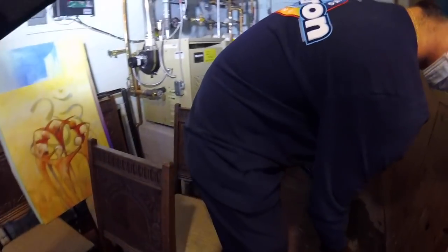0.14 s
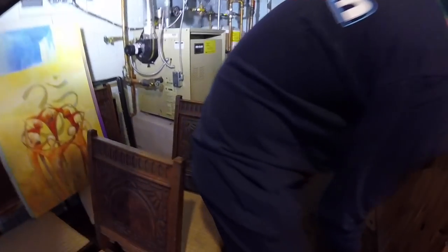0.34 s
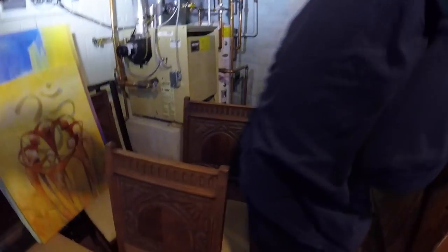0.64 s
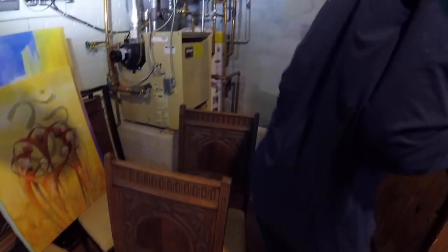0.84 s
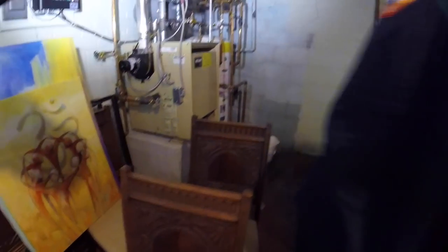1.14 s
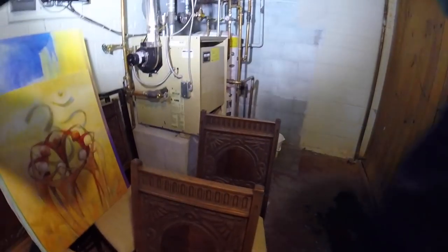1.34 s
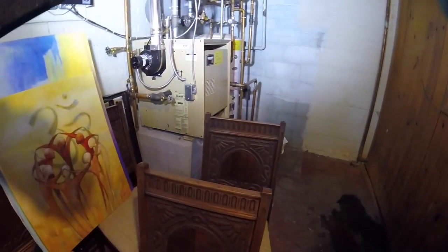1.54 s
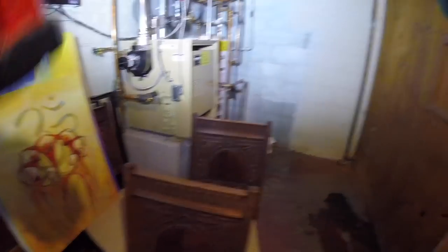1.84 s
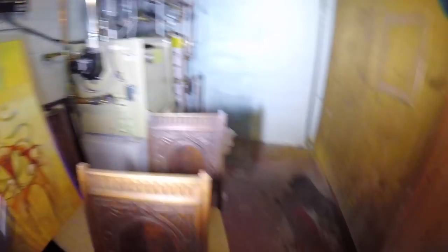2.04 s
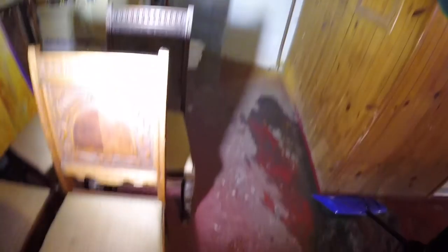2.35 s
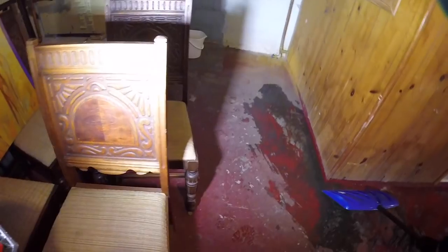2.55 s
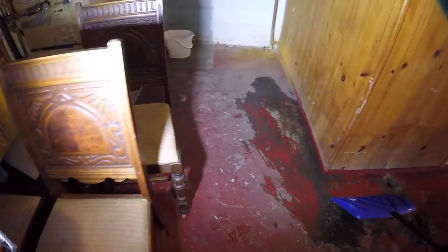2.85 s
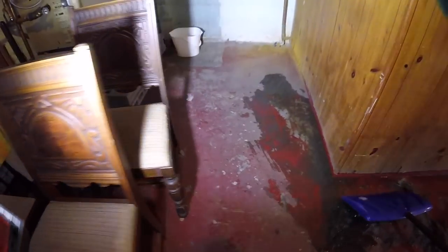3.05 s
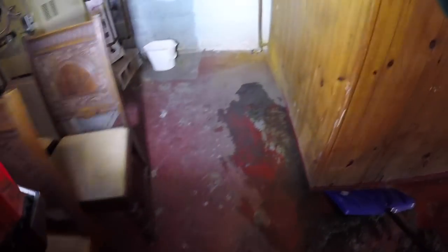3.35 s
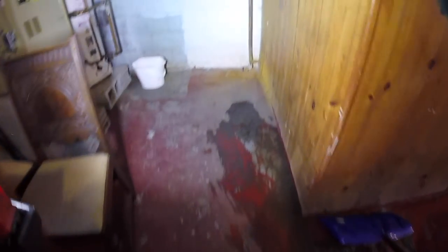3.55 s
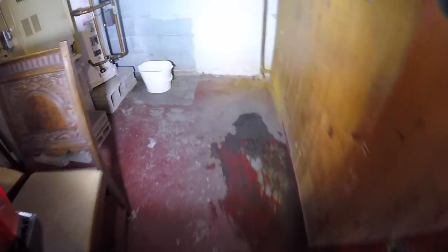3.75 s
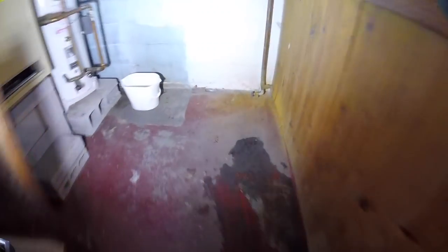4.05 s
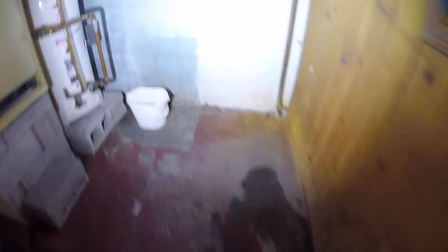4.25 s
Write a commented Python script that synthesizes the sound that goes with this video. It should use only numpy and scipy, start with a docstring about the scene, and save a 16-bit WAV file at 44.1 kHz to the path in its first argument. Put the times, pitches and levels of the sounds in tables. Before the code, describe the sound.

In a small basement, a wooden chair drags briefly over concrete with a thin squeak and is set down with two light knocks. Feet shuffle softly and clothes rustle. Then a plastic shovel lands with a loud hollow thunk and scrapes through wet muck, clatters down for a second gritty stroke, and lands once more. A faint boiler hum and hiss lie underneath, heard through a small enclosed camera microphone with little bass.

```python
"""A basement with a concrete floor, heard by a small camera in its housing. A wooden chair is dragged
aside with a stick-slip squeak and set down; then a plastic shovel lands on its edge, bounces, scrapes
wet muck along in two strokes and lands again. Friction and impact excite the normal modes of each body.
Feet shuffle, clothes rustle, a boiler hums, and the camera's low cut steps up shortly after the start."""
import sys
import numpy as np
from scipy import signal
from scipy.fft import rfft, irfft, next_fast_len
from scipy.io import wavfile
from scipy.ndimage import uniform_filter1d, map_coordinates

SR = 44100
rng = np.random.default_rng(int(sys.argv[2]) if len(sys.argv) > 2 else 0)


def wrap_up_sound(samples):
    """Save the sound to the file named by the first command line argument, as 16-bit audio."""
    columns = np.atleast_2d(samples).T
    # keep every value between -1 and 1, then stretch to whole-number steps
    tamed = np.clip(columns, -1, 1)
    steps = np.round(tamed * 32767).astype(np.int16)
    wavfile.write(sys.argv[1], SR, steps)


N = 193718
TIME = np.arange(N) / SR


def amp(db):
    """Decibel law: 20 dB is a tenfold amplitude."""
    return 10 ** (np.asarray(db) / 20)

def unit(x):
    """Normalisation to rms 1."""
    return x / np.sqrt(np.mean(x ** 2) + 1e-20)

def along(points, hz):
    """Interpolation on a logarithmic frequency axis."""
    f, values = np.transpose(points)
    return np.interp(np.log(hz + 1), np.log(f + 1), values)

def curves(rows, outside=None):
    """Linear interpolation in time, one envelope per column."""
    times, *columns = np.transpose(rows)
    return [np.interp(TIME, times, column, outside, outside) for column in columns]

def wobble(rate):
    """Random modulation: a spline through `rate` knots a second."""
    return map_coordinates(rng.standard_normal(int(N * rate / SR) + 4), [TIME * rate])

def filtered(x, response):
    """Convolution theorem: filtering multiplies the spectrum by a response."""
    size = next_fast_len(N + SR // 2)
    return irfft(rfft(x, size) * response(np.fft.rfftfreq(size, 1 / SR)), size)[..., :N]

def coloured(x, spectrum):
    """Spectral shaping, at rms 1."""
    return unit(filtered(x, lambda hz: amp(along(spectrum, hz))))

def resonate(x, modes):
    """Modal superposition: driven damped oscillators of alternating sign, at rms 1."""
    def response(f):
        return sum((-1) ** k * amp(db) * 1j * f * width / (hz * hz - f * f + 1j * f * width)
                   for k, (hz, width, db) in enumerate(modes))
    return unit(filtered(x, response))


# room decay: (frequency [Hz], T60 [s])
ROOM_DECAY = [(200, 0.29), (2000, 0.28), (10000, 0.23)]

def reverberation(x):
    """Diffuse field: each frequency decays exponentially at its own rate."""
    hz, t, spectra = signal.stft(rng.standard_normal(SR // 2), SR, nperseg=256)
    tail = signal.istft(spectra * amp(-60 * t / along(ROOM_DECAY, hz)[:, None]), SR, nperseg=256)[1]
    return signal.fftconvolve(np.pad(x, (200, 0)), tail / np.linalg.norm(tail))[:N]

# hiss spectrum: (frequency [Hz], relative density [dB])
HISS_SPECTRUM = [(2470, -43), (4200, -19), (5270, -6), (5420, -6.5), (6010, -5.5), (6480, 0), (7340, -1),
                 (8830, -1), (15300, -20)]

def hiss():
    """Stationary noise: an even, high hiss."""
    return amp(-62.5) * coloured(rng.standard_normal(N), HISS_SPECTRUM)

def boiler(fan_hz=108):
    """Periodic motion: the fan hums one tone of wavering level."""
    return amp(-54 + 0.87 * wobble(22)) * np.sin(2 * np.pi * fan_hz * TIME)

# spectra of rumble and of rasping contact: (frequency [Hz], relative density [dB])
RUMBLE_SPECTRUM = [(60, -20), (115, -9.5), (150, 1.5), (250, -5), (500, -11.5), (900, -18.5), (1300, -41)]
RASP_SPECTRUM = [(500, -14), (900, -2.5), (1600, -3.5), (2600, -10.5), (3600, -14.5), (4400, -33),
                 (5000, -46)]
# shuffling as people move about: (time [s], level [dB])
SHUFFLING = [(0, -52.5), (.1, -54), (.22, -56.5), (.9, -58), (1.3, -59), (1.6, -62), (1.8, -57.5),
             (2.1, -58), (2.9, -59), (3.05, -57.5), (3.3, -61), (4.0, -59), (4.39, -58.5)]

def movement(calm_db=-59):
    """Amplitude modulation: a rumble and a drone in the pipes swell with the shuffling."""
    shuffle_db, = curves(SHUFFLING)
    busy_db = shuffle_db - calm_db
    noise = rng.standard_normal((3, N))
    rumble = amp(-51 + 0.84 * busy_db + 0.85 * wobble(12)) * coloured(noise[0], RUMBLE_SPECTRUM)
    drone = amp(-60.5 + 1.85 * busy_db + 2.63 * wobble(8)) * resonate(noise[1], [(383, 80, 0)])
    shuffle = amp(shuffle_db + 0.88 * wobble(12)) * coloured(noise[2], RASP_SPECTRUM)
    return rumble + drone + shuffle

# fine friction through the housing's resonance: (frequency [Hz], relative density [dB])
GRIT_SPECTRUM = [(2470, -49), (4200, -11), (4410, -13), (4760, -4.5), (5080, -0.5), (5690, 1), (6800, -9.5),
                 (7880, -12), (8540, -12), (10400, -14), (11800, -38), (13700, -35), (15300, -45)]
# swells of rustling: (start [s], duration [s], level [dB])
CLOTH_SWELLS = [(-.1, 0.28, -59.5), (1.098, 0.28, -60), (1.72, 0.47, -67.5), (2.797, 0.1, -62),
                (4.198, 0.19, -65)]

def clothes(rest_db=-72):
    """Friction noise: cloth rustles in half-sine swells."""
    swells = sum(amp(db) * np.sin(np.pi * np.clip((TIME - start) / length, 0, 1))
                 for start, length, db in CLOTH_SWELLS)
    return (amp(rest_db) + swells) * coloured(rng.standard_normal(N), GRIT_SPECTRUM)

# soft footfalls: (time [s], relative level [dB], frequency [Hz], T60 [s])
FOOTFALLS = [(0.759, -31, 162.4, 0.22), (1.118, -32, 187, 0.065), (1.618, -42, 152, 0.19),
             (1.695, -40, 151.6, 0.27), (1.78, -40, 148, 0.097), (1.944, -42, 385, 0.18),
             (1.973, -35.5, 171.4, 0.13), (2.118, -18.5, 159, 0.073), (2.955, -30.5, 201, 0.093),
             (2.981, -31.5, 168, 0.24), (3.017, -34, 173, 0.13), (3.107, -37, 161, 0.19),
             (4.138, -27.5, 163, 0.2), (4.188, -32, 162, 0.14)]

def steps():
    """Damped oscillation: each sole excites one low floor resonance of wavering pitch."""
    out, t, waver = np.zeros(N + SR), np.arange(SR // 4) / SR, wobble(60)
    for time, db, hz, t60 in FOOTFALLS:
        start = round(time * SR)
        cycles = np.cumsum(hz * (1 + 0.157 * np.roll(waver, -start)[:len(t)])) / SR
        envelope = amp(db - 1.5 - 60 * t / t60) * (1 - np.exp(-t / 0.003))
        out[start:][:len(t)] += envelope * np.sin(2 * np.pi * cycles)
    return out[:N]

# a wet sole slips: (peak time [s], level [dB], 25 dB rise [s], T60 [s])
SOLE_SLIP = (3.868, -35, 0.03, 0.1051)

def scuff(slip_hz=330):
    """Relaxation oscillation: nearly regular slips of wet rubber drive two broad resonances."""
    peak_time, db, rise, t60 = SOLE_SLIP
    t = TIME - peak_time
    cycles = np.cumsum(slip_hz * (1 + .02 * wobble(100))) / SR
    slips = np.diff(np.floor(cycles), prepend=0)
    envelope = amp(db + np.minimum(25 * t / rise, -60 * t / t60))
    return envelope * resonate(slips + 0.041 * rng.standard_normal(N), [(2390, 570, 0), (3250, 580, -1)])

# small snaps: (time [s], relative level [dB], frequency [Hz], T60 [s])
SNAPS = [(.487, -44, 2530, 0.11), (.608, -44, 1200, 0.02), (.684, -41, 1850, 0.37),
         (.8, -45.5, 2520, 0.043), (1.31, -52, 2800, .08), (2.119, -40, 2070, 0.044),
         (2.119, -41.5, 5300, .02), (2.1914, -37, 1550, 0.06), (2.22, -33.5, 1700, 0.043),
         (2.224, -35.5, 5560, 0.086), (2.56, -17, 5550, 0.0067), (2.56, -29, 9180, .008),
         (2.917, -41, 5400, 0.014), (3.505, -44, 1100, .03), (3.64, -29, 5500, 0.026),
         (3.936, -39, 5600, .015), (3.966, -32.5, 880, 0.013), (3.9665, -38, 3300, 0.0079),
         (3.974, -36.5, 2680, 0.021)]
# their path to the microphone: (frequency [Hz], gain [dB])
HOUSING_GAIN = [(20, 14), (3500, 1.5), (4300, -0.5), (5300, 1), (10300, -1), (11500, -20), (15500, -29)]

def snaps(q=4.4, rise_s=0.00028):
    """Transient excitation: dying bursts of noise, each in one resonance."""
    out, t = np.zeros(N + SR), np.arange(SR // 4) / SR
    for time, db, hz, t60 in SNAPS:
        band = signal.lfilter(*signal.iirpeak(hz, q, SR), rng.standard_normal(2 * len(t)))[len(t):]
        envelope = amp(db - 5 - 60 * t / t60) * (1 - np.exp(-t / rise_s))
        out[round(time * SR):][:len(t)] += envelope * unit(band)
    return filtered(out[:N], lambda hz: amp(along(HOUSING_GAIN, hz)))

def friction(grains_per_s, spread_db, flutter_db):
    """Roughness excitation: the force on an edge catching on uneven grains of concrete."""
    catches = (rng.random(N) < grains_per_s / SR) * amp(spread_db * rng.standard_normal(N))
    bumps = signal.lfilter([1], [1, -.97], catches)
    return amp(flutter_db * wobble(40)) * (1 + bumps) * rng.standard_normal(N)

def rubbing(strokes, mix, modes, force, damping, split_hz=380):
    """Forced vibration: friction drives contact-damped modes, rasps and crunches grit."""
    pressure_db, speed_db = np.max([curves(rows, -120) for rows in strokes], axis=0)
    levels_db = [db + share * speed_db + (1 - share) * pressure_db for db, share in mix]
    envelopes = uniform_filter1d(amp(levels_db), size=400, axis=1)
    push = unit(force) + 2.07 * rng.standard_normal(N)  # the heavy body feels single grains less
    damped = [(hz, damping * width, db) for hz, width, db in modes]
    low = resonate(push, [mode for mode in damped if mode[0] < split_hz])
    high = resonate(push, [mode for mode in damped if mode[0] >= split_hz])
    rasp, grit = coloured(force, RASP_SPECTRUM), coloured(force, GRIT_SPECTRUM)
    return np.sum(envelopes * [low, high, rasp, grit], axis=0)

def knocks(blows, modes):
    """Impact: modes favoured by the contact point ring until the floor damps them; concrete cracks."""
    out, t = np.zeros(N + SR), np.arange(SR // 3) / SR
    crack_noise = coloured(rng.standard_normal(N), RASP_SPECTRUM)
    crack_noise += 0.37 * coloured(rng.standard_normal(N), GRIT_SPECTRUM)
    for time, db, low_hz, high_hz, crack_db, free_s in blows:
        start, ring = round(time * SR), 0
        for hz, width, mode_db in modes:
            octaves_away = min(abs(np.log2(hz / low_hz)), abs(np.log2(hz / high_hz)))
            gain = amp(mode_db - 20 * octaves_away + rng.normal(0, 1))
            ring += gain * np.exp(-np.pi * .35 * width * t) * np.sin(2 * np.pi * hz * t)
        pressed = 0.18 + 0.81 * np.exp(-np.maximum(t - free_s, 0) / 0.0022)
        ring = ring / np.abs(ring).max() * (1 - np.exp(-t / 0.00062)) * pressed
        clack = 0.37 * np.exp(-t / 0.00081) * np.sin(2 * np.pi * high_hz * t)
        crack_decay = amp(-7.5 - 60 * t / 0.0059) + amp(-10.5 - 60 * t / 0.19)
        crack = amp(crack_db) * crack_decay * np.roll(crack_noise, -start)[:len(t)]
        out[start:][:len(t)] += amp(db) * (ring + clack + crack)
    return out[:N]

# squeaks of a chair leg: (time [s], level [dB], T60 [s])
LEG_SQUEAKS = [(.291, -41, 0.23), (.345, -57, .4), (.96, -66, .12), (1.505, -60.5, .1)]

def squeak(pitch_hz=3468, rise_s=.002):
    """Stick-slip oscillation: a high, unsteady tone catches fast and fades."""
    envelope = 0
    for time, db, t60 in LEG_SQUEAKS:
        age = np.maximum(TIME - time, 0)
        envelope += amp(db - 60 * age / t60) * (1 - np.exp(-age / rise_s))
    flutter = amp(2.5 * wobble(70))
    cycles = np.cumsum(pitch_hz + 35 * wobble(150)) / SR
    return envelope * flutter * np.sin(2 * np.pi * cycles)

# modes of the frame: (frequency [Hz], nominal bandwidth [Hz], level [dB])
CHAIR_MODES = [(194, 20, -11), (256, 14.5, 3), (314, 51, -15.5), (514, 23, -12), (541, 46, -12.5),
               (618, 49, -10.5), (865, 53, -16), (1340, 9.2, -15.5)]
# one list per drag: (time [s], pressure as body level [dB], speed as grit level [dB])
CHAIR_DRAGS = [
    [(0.24, -48, -61), (0.256, -46, -62), (0.284, -35, -52), (0.364, -30, -47), (0.402, -38, -42),
     (0.482, -42, -55)],
    [(0.482, -46, -59), (0.49, -42, -49.5), (0.53, -34, -50), (0.538, -34, -56), (0.6, -41.5, -54)],
    [(0.62, -30.5, -57), (0.64, -44, -64), (0.67, -53, -70), (0.675, -39, -68)],
    [(0.7, -32, -48.5), (0.736, -57, -52), (0.77, -45, -60), (0.864, -50, -60), (0.876, -69, -71),
     (0.9, -56, -60)],
]
# low modes, high modes, rasp, grit: (gain [dB], share of speed [0-1])
CHAIR_LAYERS = [(-0.9, 0), (-5, 0.27), (-2.5, 0.71), (-1, 0.97)]
# blows: (time [s], level [dB], favoured low [Hz], favoured high [Hz], crack gain [dB], free ring [s])
CHAIR_BLOWS = [(.608, -23.5, 199, 557, -17.5, 0.018), (.68, -23, 312, 540, -14, 0.018)]

def chair():
    """Forced and free vibration of a wooden frame, dragged and then set down."""
    force = friction(grains_per_s=230, spread_db=1, flutter_db=0.9)
    drag = rubbing(CHAIR_DRAGS, CHAIR_LAYERS, CHAIR_MODES, force, damping=1.15)
    return drag + squeak() + knocks(CHAIR_BLOWS, CHAIR_MODES)

# modes of the blade: (frequency [Hz], nominal bandwidth [Hz], level [dB])
BLADE_MODES = [(162.3, 34, -6.5), (211, 16, -4), (276, 22.5, -4), (316.4, 37.5, -4.5), (418.2, 25, -2),
               (475, 60, -7.5), (588, 34, -7.5), (700, 50, -12.5), (842, 106, -18.5), (1063, 79, -16.5),
               (1230, 160, -25.5)]
# one list per contact: (time [s], pressure as body level [dB], speed as grit level [dB])
BLADE_STROKES = [
    [(2.19, -45, -55.5), (2.194, -40.5, -50), (2.22, -33, -47)],
    [(2.34, -36, -71), (2.366, -27, -58.5), (2.424, -38.5, -45.5), (2.574, -30, -34), (2.63, -31, -40),
     (2.692, -32.5, -36.5), (2.772, -36, -54), (2.794, -41.5, -61), (2.888, -58, -60), (2.9, -45, -66)],
    [(3.43, -26, -62), (3.454, -39, -68), (3.494, -35, -47), (3.542, -27, -45), (3.568, -29.5, -44),
     (3.636, -24.5, -39), (3.8, -29, -46), (3.848, -38.5, -49), (3.984, -49.5, -66.5), (4.0, -52, -60)],
    [(4.26, -53, -68), (4.278, -54, -56), (4.312, -34, -65), (4.342, -25.5, -60), (4.372, -38, -65),
     (4.39, -30, -66)],
]
# low modes, high modes, rasp, grit: (gain [dB], share of speed [0-1])
BLADE_LAYERS = [(-3.5, 0.009), (-1.5, .22), (-6, 0.59), (-1.5, .99)]
# blows: (time [s], level [dB], favoured low [Hz], favoured high [Hz], crack gain [dB], free ring [s])
BLADE_BLOWS = [(2.231, -4, 272.5, 416, -26.5, 0.041), (2.351, -20, 290, 576, -30, 0.01),
               (2.368, -28, 210, 583, -27, 0.063), (3.364, -7, 350, 575, -23.5, 0.0036),
               (3.379, -9.5, 210, 316, -40, 0.017), (3.393, -20, 211, 318, -15, 0.008),
               (3.405, -10.5, 205, 317, -48, 0.016), (3.505, -20.5, 234, 577, -14.5, 0.016),
               (4.3, -21, 288, 430, -19, 0.066), (4.324, -15.5, 288, 413, -27, 0.044),
               (4.38, -18, 298, 410, -40, .02)]

def shovel():
    """Plate vibration: scraping and impact excite the same modes of a plastic blade."""
    force = friction(grains_per_s=400, spread_db=2.5, flutter_db=1.1)
    scrape = rubbing(BLADE_STROKES, BLADE_LAYERS, BLADE_MODES, force, damping=1.4)
    return scrape + knocks(BLADE_BLOWS, BLADE_MODES)

def scene():
    """Superposition of direct sound, reverberation and background."""
    direct = chair() + shovel() + snaps() + steps() + scuff()
    return (direct + amp(-9.5) * reverberation(direct) + hiss() + boiler() + movement() + clothes())[None]

# rumble of the camera's electronics: (frequency [Hz], relative density [dB])
CAMERA_NOISE = [(20, -81), (50, -82.5), (100, -86.5), (140, -120)]

def record(dry, step_s=.36, before_hz=95, after_hz=134, top_hz=15450):
    """Band limiting: a steep low cut that steps up once, the camera's own rumble, and a treble limit."""
    def low_cut(hz):
        return signal.sosfilt(signal.cheby2(8, 42, .82 * hz, "high", fs=SR, output="sos"), dry)
    fade = np.clip((TIME - step_s) / 0.0081, 0, 1)
    rumble = filtered(rng.standard_normal(N), lambda hz: amp(along(CAMERA_NOISE, hz)) * np.sqrt(SR / 2) / 3)
    thinned = (1 - fade) * low_cut(before_hz) + fade * low_cut(after_hz)
    return filtered(thinned + rumble, lambda hz: hz < top_hz)


dry = scene()
out = record(dry)
wrap_up_sound(out)
```